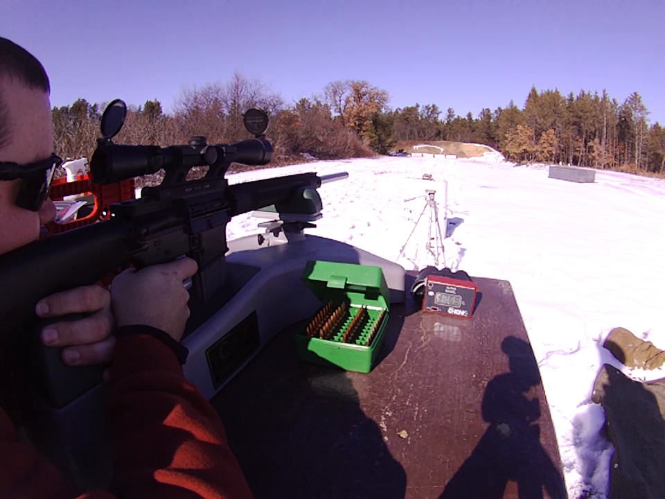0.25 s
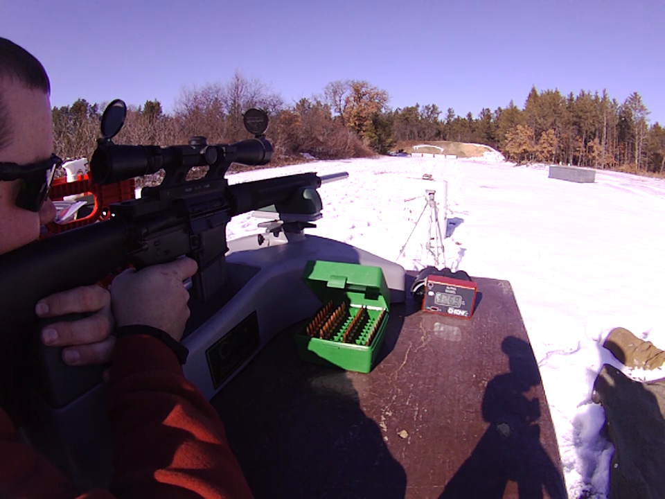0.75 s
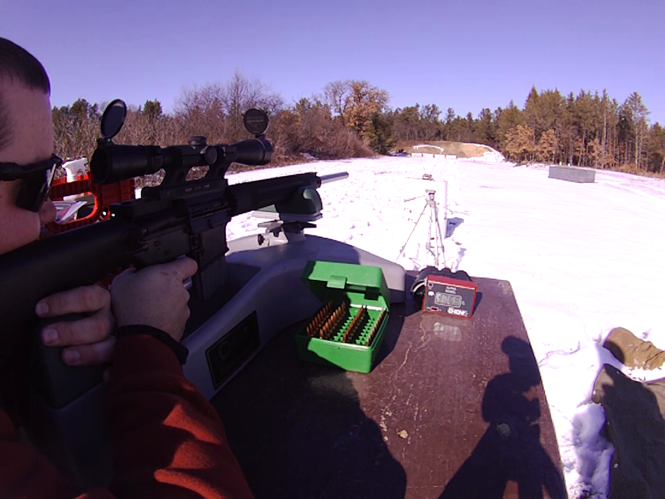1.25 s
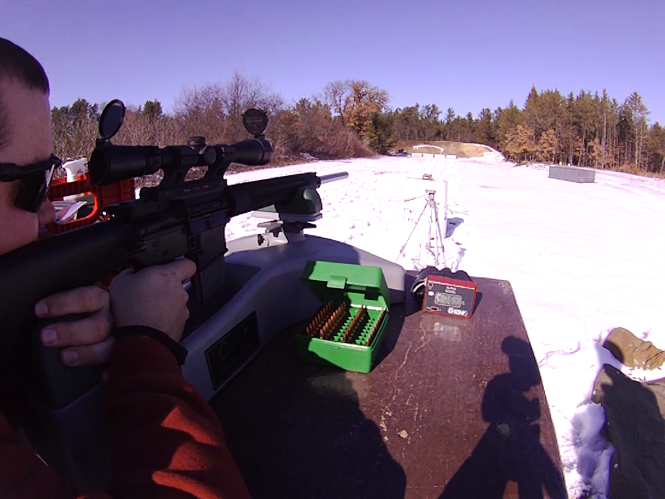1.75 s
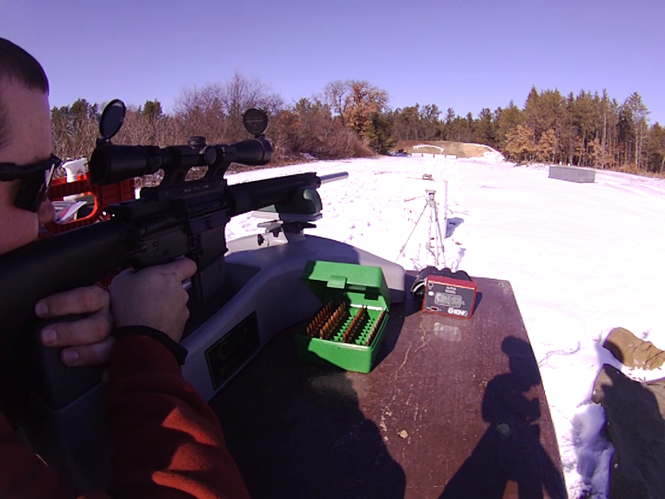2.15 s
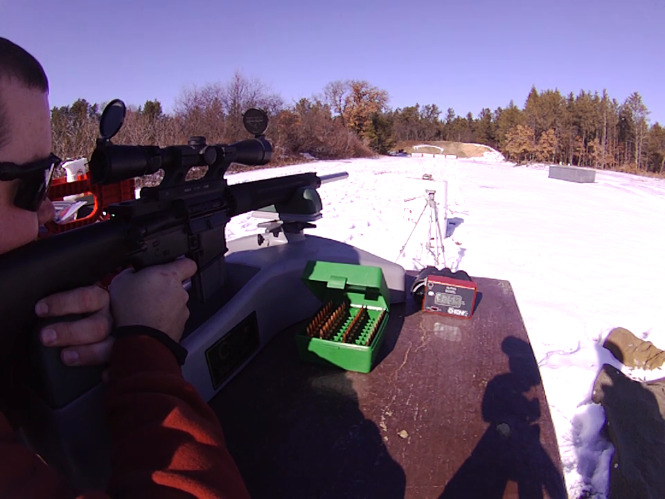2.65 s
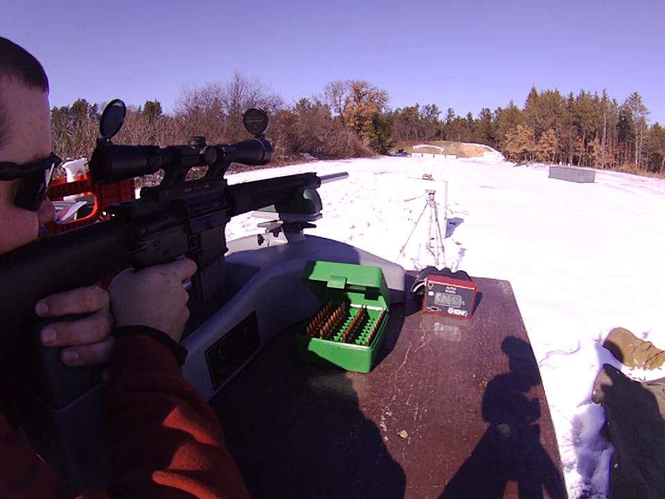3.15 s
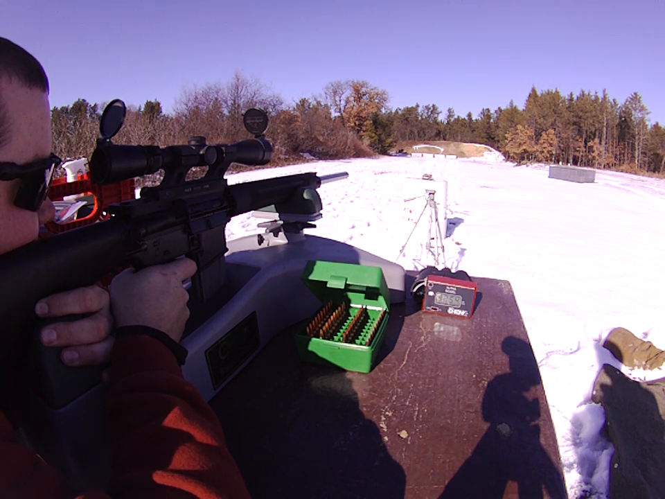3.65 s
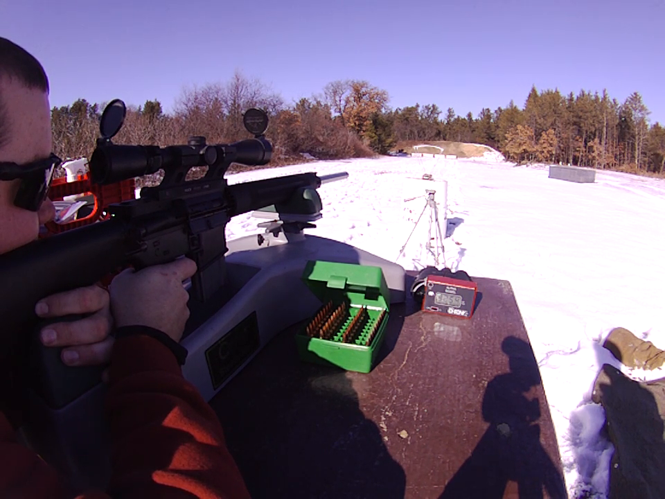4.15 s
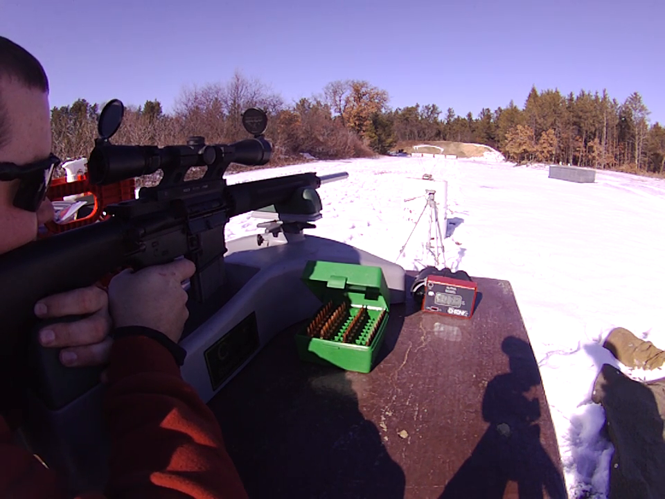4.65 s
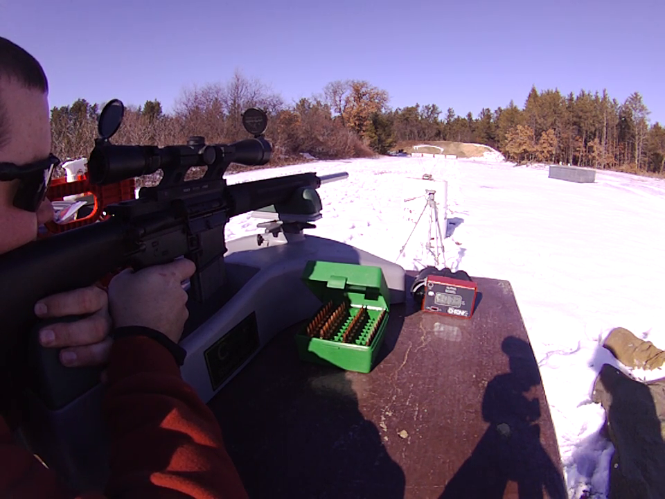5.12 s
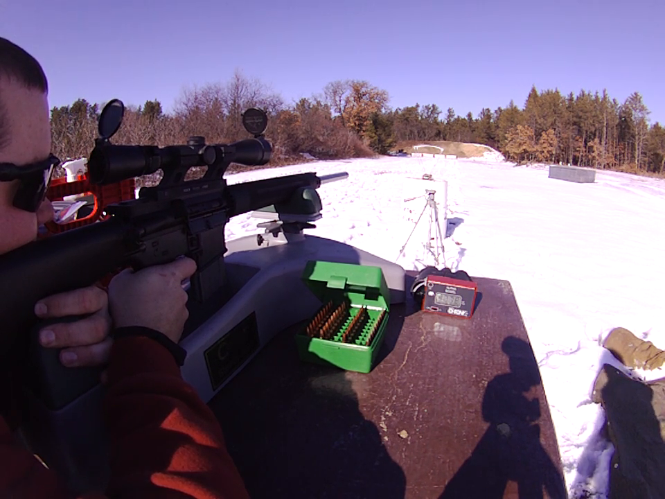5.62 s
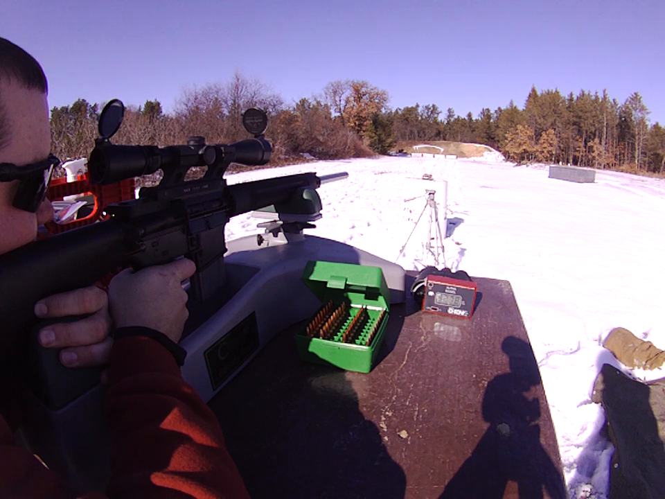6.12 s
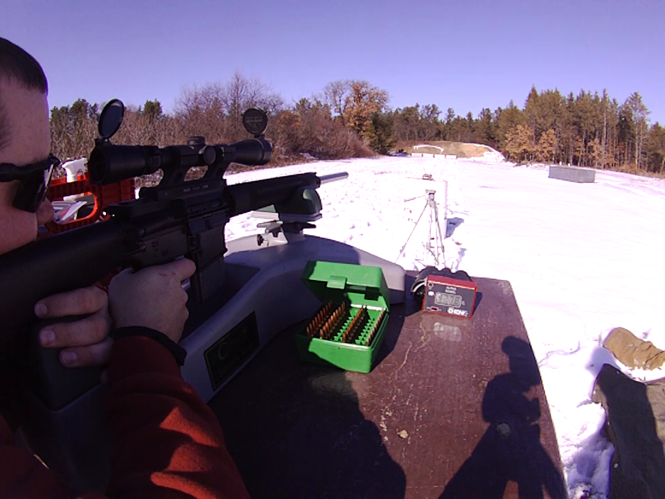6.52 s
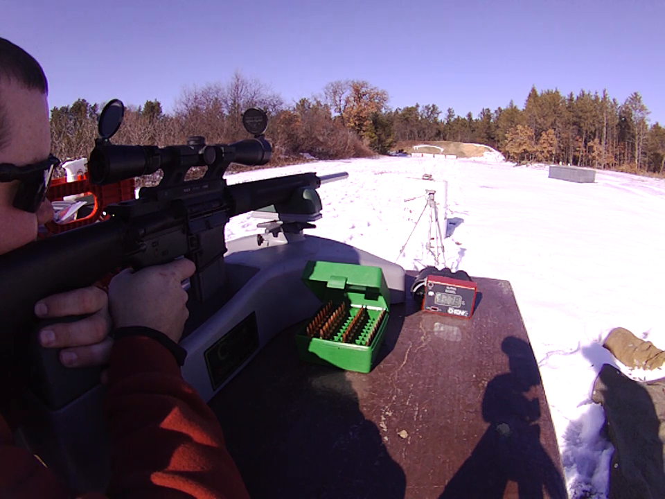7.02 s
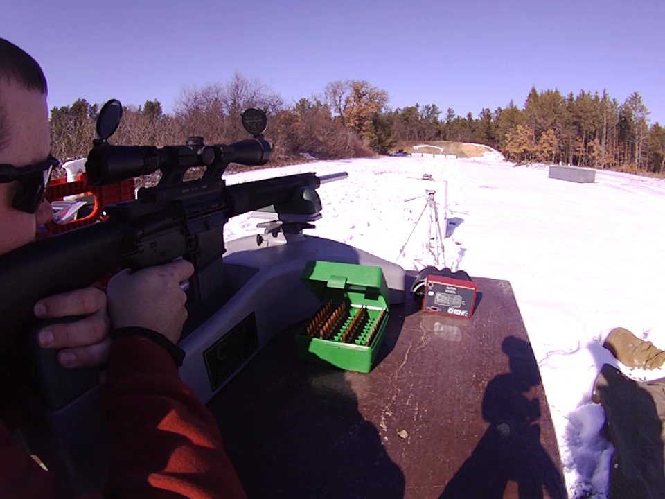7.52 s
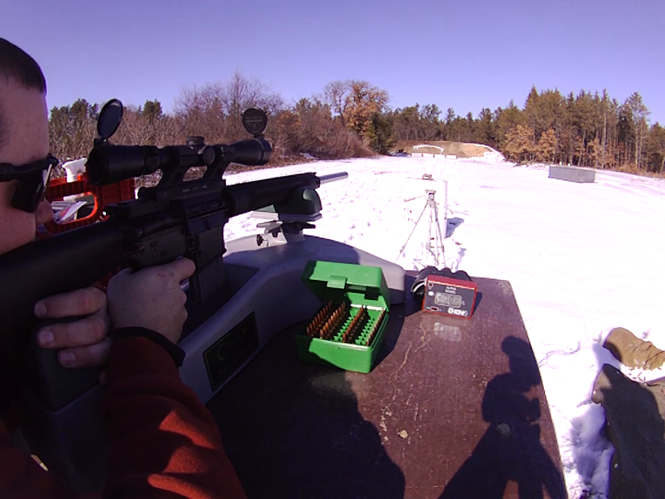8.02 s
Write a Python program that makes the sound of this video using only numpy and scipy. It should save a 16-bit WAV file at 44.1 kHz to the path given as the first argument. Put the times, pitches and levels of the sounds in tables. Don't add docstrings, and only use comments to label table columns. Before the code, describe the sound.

Three very close rifle shots on an open snowy range, heard through a small overloaded camera microphone with automatic gain. Wind buffets first; each blast crackles and distorts, with steel bolt clatter, brushy hiss, dull bank slaps and a rolling echo from far woods. Hiss sinks after every shot and creeps back. Trigger resets click, loose parts tick and spent brass rings faintly, with light breeze at the end.

```python
import sys
import numpy as np
from scipy import signal
from scipy.fft import rfft, irfft, next_fast_len
from scipy.io import wavfile
from scipy.ndimage import uniform_filter1d, map_coordinates

SR = 44100
rng = np.random.default_rng(int(sys.argv[2]) if len(sys.argv) > 2 else 0)


def invert_db(x):
    u = np.asarray(x, float) / 20
    return 10 ** u


def wrap_up_sound(samples):
    columns = np.atleast_2d(samples).T
    tamed = np.clip(columns, -1, 1)
    steps = np.round(tamed * 32767).astype(np.int16)
    wavfile.write(sys.argv[1], SR, steps)


N = 364707

# (centre [s], half-length [s], level [dB], brightness [dB])
GUSTS = [(0, 0.012, -23, 0), (0.051, 0.038, -43, 5.5), (.152, 0.029, -27.5, 4.5), (0.235, 0.017, -29, 0.9),
         (0.258, 0.023, -31, -0.5), (0.336, 0.029, -29.5, -3), (.415, 0.039, -32.5, -9),
         (0.425, 0.0042, -22, -6.5), (0.597, .012, -37, -1), (0.655, 0.0058, -37.5, -0.5),
         (0.675, 0.028, -24.5, -40), (0.808, 0.012, -23, -6.5), (.888, 0.022, -35, -14),
         (0.941, 0.02, -33.5, -8), (1.099, 0.03, -25.5, -7), (1.144, 0.039, -26.5, -8.5),
         (1.268, 0.011, -27, -0.8), (1.31, 0.03, -27, -0.5), (1.352, 0.022, -36.5, 4.7),
         (2.335, .025, -41, -1.5), (3.819, .011, -44.5, -3), (3.898, 0.014, -42.5, -2),
         (3.931, 0.016, -27, -26), (3.998, .036, -49, -17), (5.686, 0.025, -58, -17),
         (7.96, 0.012, -46, -18), (8.149, .02, -40.5, 3), (8.188, 0.021, -44, 2.5),
         (8.245, 0.021, -34, -1.5)]
EDDY_SHARE = [
    [1],
    [0.87],
    [.65],
]
SHARP_DB, SHARP_GROWS = -24, 2.6

# (time [s], level [dB])
GAIN = [(0, -74.5), (.3, -72.5), (.9, -66.5), (1.36, -69.5), (1.85, -99), (2.1, -89), (2.4, -76),
        (2.85, -67), (4.33, -67), (4.8, -100), (5.6, -96), (6.0, -81.5), (6.68, -75.5), (6.81, -71),
        (7.11, -70.5), (7.56, -100), (7.99, -92), (8.27, -76.5)]
DUCK_DB, DUCK_S = 11.5, 0.13
# (frequency [Hz], density [dB])
HISS = [(590, -36), (1000, -10), (3410, -7.5), (3780, -7), (5740, -8), (14300, -12), (15300, -8),
        (15900, -25.5)]
TOP_HZ, TOP_FROM_DB, TOP_GROWS = 12700, -82, 3
# (time [s], level [dB])
BREEZE_LEVEL = [(0, 30), (.28, 27.5), (.4, 18.5), (1.0, 16), (1.33, 24.5), (2.0, 22), (2.35, 24),
                (2.75, 17), (3.47, 2.5), (3.95, 16), (4.3, 7), (4.9, -0.5), (5.5, 3), (5.68, 16), (6.0, 2),
                (7.0, 7), (7.8, 4.5), (8.2, 29)]
# (frequency [Hz], level [dB])
BREEZE_COLOUR = [(12, -35), (20, -9.5), (38, 2), (124, 1), (227, -6.5), (250, -2.5), (320, -39.5),
                 (550, -120)]
RUMBLE_DB, RUMBLE_T60 = -46.5, .7

# (time after shot [s], level [dB])
WOODS = [(.07, 35), (.17, 30), (.33, 32), (.36, 40), (.65, 34.5), (1.0, 28.5), (1.4, 21.5), (1.9, 16.5),
         (2.9, 0)]
WOODS_DB = [
    0.5,
    2,
    1.4,
]
# (frequency [Hz], level [dB])
ROLL = [(71, -25.5), (120, -13), (254, -4), (394, 3), (585, 2.5), (857, -6), (1080, -8), (1330, -16.5),
        (1980, -23.5), (4000, -36), (5200, -57), (8800, -120)]
# (frequency [Hz], level [dB])
RUSTLE = [(600, -38), (1100, -3.5), (1700, 1.5), (2500, -0.5), (4000, -6), (6000, -14), (8000, -29.5),
          (12500, -54)]
# (frequency [Hz], level [dB])
FRESH = [(350, -39.5), (600, -1), (900, 3), (1250, -0.5), (1500, -7.5), (2000, -12), (2600, -32.5)]
STILL_ROLL_DB, STILL_RUSTLE_DB = 9, 1
RUSTLE_GROWS, RUSTLE_DB = 1.75, -40.5
FRESH_GROWS, FRESH_DB = 1.31, -15
HOLLOW_DB, HOLLOW_S = 3.5, 0.61

FIRED = [
    1.364,
    4.3356,
    7.112,
]
# (muzzle wave [dB], ring [dB], hammer [dB])
SHOTS = [
    (1, -3.5, -17),
    (-7.5, -9, -16.5),
    (0, -4, -20.5),
]
ECHO_DB = [
    -0.44,
    -4.5,
    -0.44,
]
# (from [ms], to [ms] after the shock, level [dB])
FITS = [
    (.4, 1.25, -3),
    (3.35, 4.35, -2),
    (5, 5.15, -5),
    (6.15, 7.25, -7),
]
# (from [ms], to [ms], position [-1..1], let-go [ms])
RAILS = [
    (1.4, 1.5, .95, .5),
    (3.3, 4.4, -.3, .8),
    (5.5, 5.95, .95, .3),
]
DROPOUT_DB, FIT_EDGE_DB_PER_MS, OVERLOAD_MS = -14, 45, 7.3
# (delay [ms], pressure [1])
ARRIVALS = [
    (9.2, -1.7),
    (11.3, .9),
    (14.2, .55),
    (19, .2),
]
# (frequency [Hz], width [Hz], level [dB])
BENCH = [(210, 36, -3.5), (302, 36, -6.5), (338, 37, -4), (464, 95, -9.5), (710, 300, -3.5),
         (740, 50, -9.5), (1100, 90, -8.5), (1400, 900, -10)]
# (frequency [Hz], t60 [s])
NEAR = [(60, 0.11), (150, .25), (300, 0.17), (1000, 0.07), (3000, 0.13), (8000, .12), (15000, 0.063)]
# (frequency [Hz], level [dB])
NEAR_COLOUR = [(40, -9), (100, -4), (300, 4), (1000, -4), (2200, -23), (5000, -24.5), (10000, -26.5),
               (16000, -29)]
# (frequency [Hz], level [dB])
FIELD_COLOUR = [(40, -45.5), (120, -26.5), (350, -22), (800, -32.5), (1500, -43), (3000, -70.5)]

# (frequency [Hz], width [Hz], level [dB])
RECEIVER = [(1490, 360, 0), (4600, 970, -6.5), (5240, 430, -1), (6410, 690, -7), (9230, 810, -12),
            (12700, 510, -15.5), (14500, 330, -23)]
# (time after shot [s], peak [dB], low knock [dB], t60 [s])
CYCLE = [
    (0.021, -21.5, 0, .018),
    (.045, -32.5, -7.5, .016),
    (0.059, -18.5, -13.5, .016),
    (.1188, -40.5, -2.5, 0.007),
]
CYCLE_DB = [
    -1,
    -7.5,
    -2,
]
# (time [s], peak [dB])
RESETS = [
    (2.3201, -10),
    (5.637, -25),
    (8.0272, -19.5),
]
# (time [s], peak [dB], low knock [dB])
TICKS = [(2.0086, -56.5, 5.5), (2.5294, -54, 2), (4.8794, -64.5, 5), (4.996, -72, -4.5), (5.5, -74, .5),
         (5.6765, -69.5, 0), (5.7646, -72, 2.5), (5.8144, -61, -15), (7.517, -55, 6), (7.6562, -67, 8.5),
         (7.7614, -78.5, 19.5), (7.8964, -72, 10.5), (7.9564, -70, 1.3), (8.199, -60, 9.5)]
# (time [s], frequency [Hz], level [dB], t60 [s])
BRASS = [
    (5.68, 10850, -77, .17),
    (5.675, 15160, -80, .25),
    (7.763, 10730, -82, .2),
    (7.763, 14960, -58, .06),
]
SHARP, BOLT_RISE = .0002, 0.00047
STEEL_T60, RESET_T60, RESET_KNOCK_DB = 0.0043, 0.012, -14.5
THUD_DB, SNAP, LINGER_DB = -29, 0.55, -23.5

# (time after shot [s], level [dB])
BRUSH = [(.06, -73.5), (.079, -57), (.15, -62), (.22, -65), (.255, -73), (.275, -62.5), (.4, -69),
         (.48, -79.5), (.7, -90)]
# (frequency [Hz], level [dB])
BRUSH_COLOUR = [(900, -31), (1800, -5.5), (2500, -4), (3600, -1), (5500, -2.5), (7000, -12), (10000, -22),
                (13000, -55)]
# (time after shot [s], peak [dB])
BANKS = [
    (.164, -40.5),
    (.247, -37),
    (0.268, -46),
    (.376, -44.5),
    (0.4261, -43),
]
SLAP_T60 = .045

# (frequency [Hz], level [dB])
CONVERTER = [(20, 22.5), (60, 17.5), (200, 3.5), (2500, -0.5), (6000, -4), (12300, -5.5), (12800, -39.5)]
CONVERTER_DB = -88.5


def unit(x):
    return x / np.sqrt(np.mean(x ** 2) + 1e-20)


def along(points, hz):
    f, v = np.transpose(points)
    return np.interp(np.log(hz + 1), np.log(f + 1), v)


def curves(rows):
    s, value = np.transpose(rows)
    return np.interp(np.arange(N) / SR, s, value)


def wobble(rate):
    knots = rng.standard_normal(int(N * rate / SR) + 4)
    return map_coordinates(knots, [np.arange(N) * rate / SR])


def filtered(x, response):
    m = next_fast_len(len(x) + 8192)
    return irfft(rfft(x, m) * response(np.fft.rfftfreq(m, 1 / SR)), m)[:len(x)]


def body(modes):
    def response(f):
        return sum((-1) ** k * invert_db(db) * 1j * f * w / (c * c - f * f + 1j * f * w)
                   for k, (c, w, db) in enumerate(modes))
    return response


def rush(spectrum, patchy_db):
    z = signal.stft(rng.standard_normal(N + 512), nperseg=512)[2]
    field = uniform_filter1d(rng.standard_normal(z.shape), 5, 0)
    field = uniform_filter1d(field, 10, 1)
    x = signal.istft(z * invert_db(patchy_db * unit(field)), nperseg=512)[1][:N]
    return unit(filtered(x, lambda hz: invert_db(along(spectrum, hz))))


def add(out, s, x):
    part = out[round(s * SR):][:len(x)]
    part += x[:len(part)]


def burst(t60, modes, rise, top_hz=20000):
    t = np.arange(SR // 10) / SR
    decay = max(t60, .002)
    fall = invert_db(-60 * t / decay) + invert_db(LINGER_DB - 60 * t / (3.5 * decay))
    contact = (1 - np.exp(-t / rise)) * (1 + SNAP * np.exp(-t / 0.00065))
    puff = rfft(rng.standard_normal(len(t)) * fall * contact)
    even = irfft(puff / np.sqrt(uniform_filter1d(np.abs(puff) ** 2, size=90)), len(t))
    even = even * (t < t[-1] / 2)
    x = filtered(even, lambda f: body(modes)(f) / (1 + 1j * f / top_hz) ** 2)
    return x / np.abs(x).max()


def since_shot():
    return np.arange(N) / SR - np.array(FIRED)[:, None]


def after_shots(rows, more_db=0):
    s, db = np.transpose(rows)
    each = np.interp(since_shot(), s, db, left=-150, right=-150)
    each = each + np.add(ECHO_DB, more_db)[:, None]
    return each.max(axis=0)


def snatch(seconds):
    u = np.maximum(since_shot(), 0) / seconds
    return (u * np.exp(1 - u)).sum(axis=0)


def gain_db():
    return curves(GAIN) - DUCK_DB * snatch(DUCK_S)


def wind():
    t = np.arange(N) / SR
    levels = np.zeros((3, N))
    for s, half, db, upper_db in GUSTS:
        sharp_db = SHARP_DB + SHARP_GROWS * upper_db
        near = slice(max(round(s * SR) - SR // 10, 0), round(s * SR) + SR // 10)
        swell = np.exp(-np.abs((t[near] - s) / (half * np.array(EDDY_SHARE))) ** 1.8)
        levels[:, near] += invert_db(db + np.array([[0], [upper_db], [sharp_db]])) * swell
    eddies = rng.standard_normal(N) * invert_db(3.5 * wobble(110))
    out = np.zeros(N)
    parts = [(198, 130, 330), (285, 350, 580), (680, 390, 1500)]  # (Hz, width Hz, top Hz)
    for level, (hz, width, top_hz) in zip(levels, parts):
        blips = filtered(eddies, lambda f: body([(hz, width, 0)])(f) / (1 + (f / top_hz) ** 5.9))
        blips /= np.sqrt(np.abs(uniform_filter1d(blips ** 2, size=1000)) + 1e-12)
        out += invert_db(-3.0) * level * blips
    return out


def self_noise():
    hiss = unit(filtered(rng.standard_normal(N), lambda hz: invert_db(along(HISS, hz)) * (hz < 15350)))
    top = filtered(hiss, lambda hz: hz > TOP_HZ)
    hiss = hiss - top * (1 - invert_db(TOP_GROWS * np.minimum(gain_db() - TOP_FROM_DB, 0)))
    return invert_db(gain_db() + 5) * hiss


def breeze_and_ground():
    breeze = invert_db(gain_db() + curves(BREEZE_LEVEL))
    rumble = invert_db(after_shots([(.02, RUMBLE_DB), (RUMBLE_T60, RUMBLE_DB - 62)]))
    deep = np.hypot(breeze, rumble) * invert_db(5.0 + 0.89 * wobble(30))
    return deep * rush(BREEZE_COLOUR, patchy_db=1.5)


def woods():
    answer_db = after_shots(WOODS, WOODS_DB)
    roll = np.hypot(invert_db(answer_db - HOLLOW_DB * snatch(HOLLOW_S) ** 3), invert_db(STILL_ROLL_DB))
    roll = roll * invert_db(2 + 0.4 * wobble(7.4) + 0.33 * wobble(60))
    rustle = np.hypot(invert_db(RUSTLE_GROWS * answer_db + RUSTLE_DB), invert_db(STILL_RUSTLE_DB))
    rustle = rustle * invert_db(0.5 + .3 * wobble(45))
    fresh = invert_db(FRESH_GROWS * answer_db + FRESH_DB + .6 * wobble(40))
    answer = fresh * rush(FRESH, patchy_db=0.5)
    answer += roll * rush(ROLL, patchy_db=0.5)
    answer += rustle * rush(RUSTLE, patchy_db=1.5)
    return invert_db(gain_db()) * answer


def overload():
    ms = np.arange(-44, 400) / SR * 1000

    def outside(a, b):
        return np.maximum(np.maximum(a - ms, ms - b), 0)

    capsule = body([(4540, 3200, 4), (7900, 670, -7), (1940, 670, -0.5)])
    shake = unit(filtered(rng.standard_normal(len(ms)), capsule))
    spiky = shake * np.abs(shake) ** 0.18
    edge = FIT_EDGE_DB_PER_MS * (1 + 2 * (ms > OVERLOAD_MS))
    fits = FITS + [(0.0023, OVERLOAD_MS, DROPOUT_DB)]
    strength = np.max([db - edge * outside(a, b) for a, b, db in fits], axis=0)
    spiky = np.where(strength < -6, -np.abs(spiky), spiky)
    rest = np.zeros(len(ms))
    for a, b, level, let_go in RAILS:
        slope = np.where(ms < a, min(let_go, .3), let_go)
        rest += level * np.clip(1 - outside(a, b) / slope, 0, 1)
    return rest + invert_db(strength - 0.1) * spiky


def muzzle(wave_db, ring_db):
    t = np.arange(SR * 6 // 10) / SR
    pulses = np.zeros(len(t))
    for ms, size in ARRIVALS:
        u = np.maximum(t - ms / 1000, 0) / .00045
        pulses += size * u ** 0.7 * (1 - u / 2.2) * np.exp(1 - u)
    ring = filtered(pulses, body(BENCH)) * 0.83
    hz, frame, z = signal.stft(rng.standard_normal(len(t)), SR, nperseg=128)
    near = invert_db(along(NEAR_COLOUR, hz)[:, None] - 60 * frame / along(NEAR, hz)[:, None])
    far = invert_db(along(FIELD_COLOUR, hz)[:, None] - 60 * frame / 0.3)
    tail = signal.istft(z * (near + far), SR, nperseg=128)[1]
    tail = tail[:len(t)] * np.clip((t - .0095) / 0.00067, 0, 1)
    return invert_db(wave_db) * pulses + invert_db(ring_db) * (ring + invert_db(10.5) * tail)


def rifle():
    out = np.zeros(N)
    hammer = [(3700, 950, 3.5), (6030, 3400, -1.5), (11600, 5800, -6.5)]  # (Hz, width Hz, dB)
    for s, (wave_db, ring_db, hammer_db) in zip(FIRED, SHOTS):
        add(out, s - .0053, invert_db(hammer_db) * burst(0.013, hammer, SHARP))
        add(out, s - .001, overload())
        add(out, s, muzzle(wave_db, ring_db))
    return filtered(out, lambda f: (1 - 0.83 * body([(455, 170, 0)])(f)) * 1j * f / (70 + 1j * f))


def action():
    out = np.zeros(N)
    clacks = [(s + lag, db + hard_db, knock_db, t60, BOLT_RISE)
              for s, hard_db in zip(FIRED, CYCLE_DB) for lag, db, knock_db, t60 in CYCLE]
    clacks += [(s, db, RESET_KNOCK_DB, RESET_T60, SHARP) for s, db in RESETS]
    clacks += [(*row, STEEL_T60, SHARP) for row in TICKS]
    for s, db, knock_db, t60, rise in clacks:
        clack = burst(t60, [(2810, 860, -17)] + RECEIVER[1:], rise)
        knock = burst(t60 * 3.1, [(780, 160, -1), RECEIVER[0]], rise, top_hz=3000)
        add(out, s, invert_db(db) * clack)
        add(out, s, invert_db(db + knock_db) * knock)
    for s, db in RESETS:
        add(out, s, invert_db(db + THUD_DB) * burst(0.053, [(315, 290, 0)], 0.0034, top_hz=870))
    return out


def brush():
    return invert_db(after_shots(BRUSH) + 1.3 * wobble(56)) * rush(BRUSH_COLOUR, patchy_db=1.5)


def banks():
    out = np.zeros(N)
    earth = [(546.2, 1300, 0.84), (1148.4, 2270, -0.6)]  # (Hz, width Hz, dB)
    for s, echo_db in zip(FIRED, ECHO_DB):
        for lag, db in BANKS:
            slap = burst(SLAP_T60, earth, rise=0.0029, top_hz=1010)
            add(out, s + lag, invert_db(db + echo_db - 1) * slap)
    return out


def brass():
    out, t = np.zeros(N), np.arange(SR // 4) / SR
    beat = 1 + 0.26 * np.sin(2 * np.pi * 24 * t)
    for s, hz, db, t60 in BRASS:
        add(out, s, invert_db(db - 60 * t / t60) * beat * np.sin(2 * np.pi * hz * t))
    return out


def scene():
    air = wind() + self_noise() + breeze_and_ground() + woods()
    shots = rifle() + action() + brush() + banks() + brass()
    return (air + shots)[None]


def band_limit(x):
    return signal.sosfilt(signal.butter(12, 16030, fs=SR, output="sos"), x)


def record(dry):
    heard = filtered(dry[0], lambda f: (1j * f / (40 + 1j * f)) ** 2)[None]
    heard = heard + invert_db(CONVERTER_DB) * rush(CONVERTER, patchy_db=2.0)
    held = heard / (1 + np.abs(heard) ** 8) ** (1 / 8)
    held = filtered(held[0], lambda f: 1 / (1 + (f / 15900) ** 30))[None]
    return band_limit(held)


dry = scene()
out = record(dry)
wrap_up_sound(out)
```